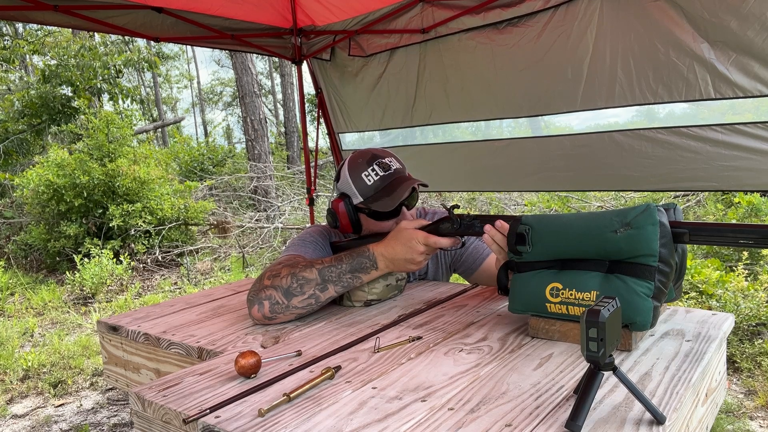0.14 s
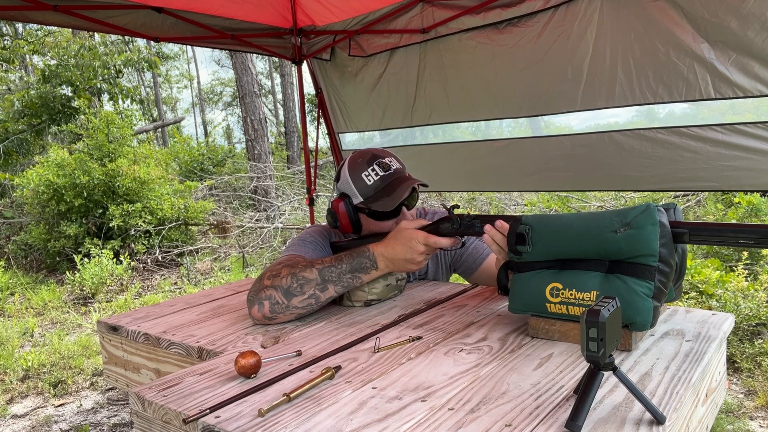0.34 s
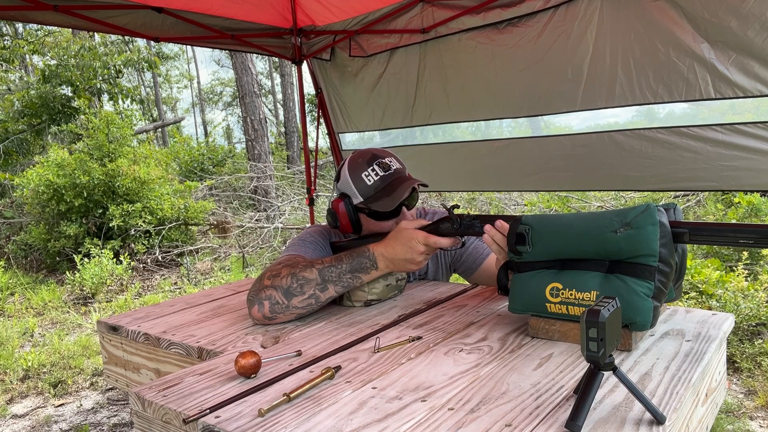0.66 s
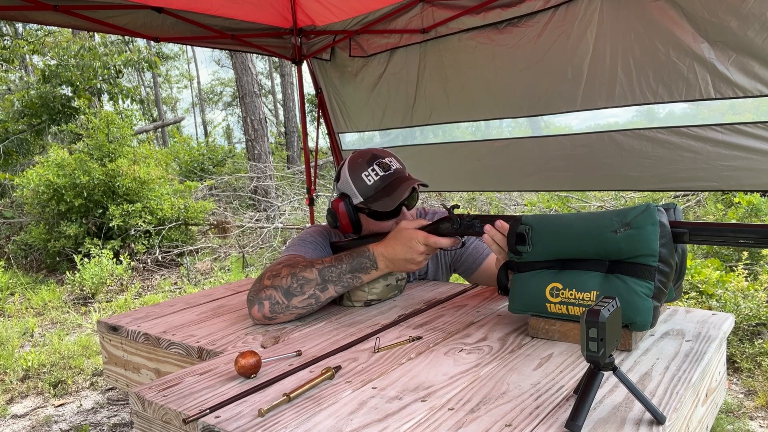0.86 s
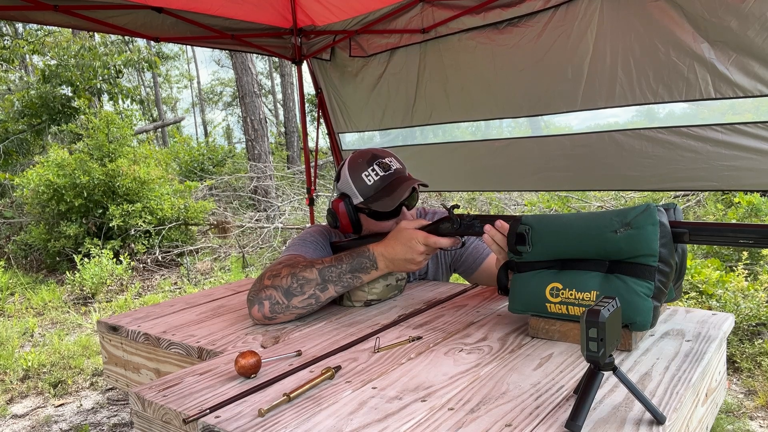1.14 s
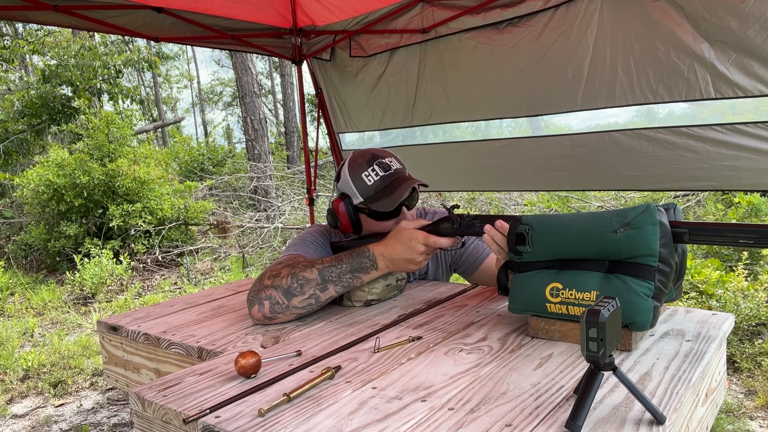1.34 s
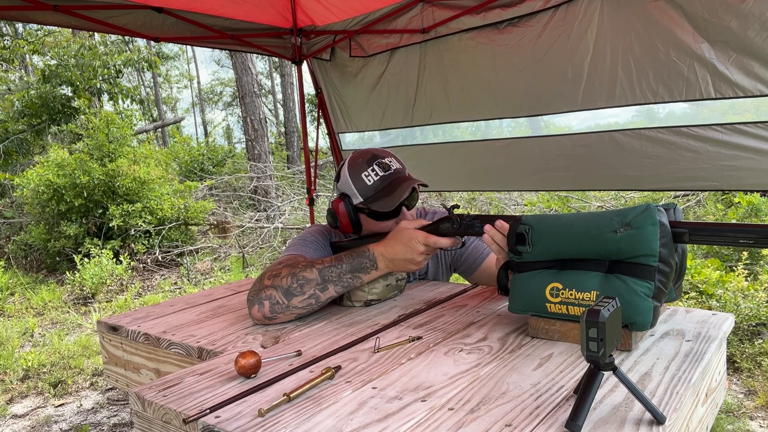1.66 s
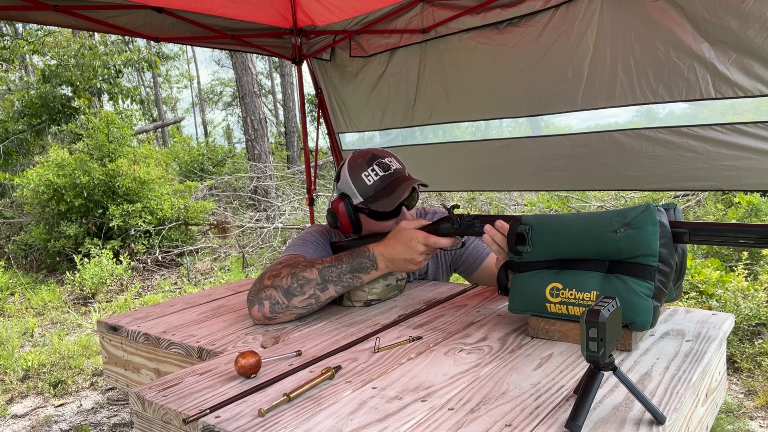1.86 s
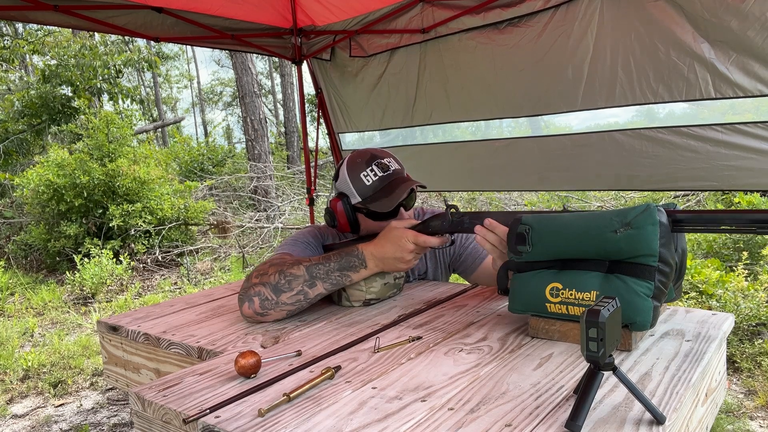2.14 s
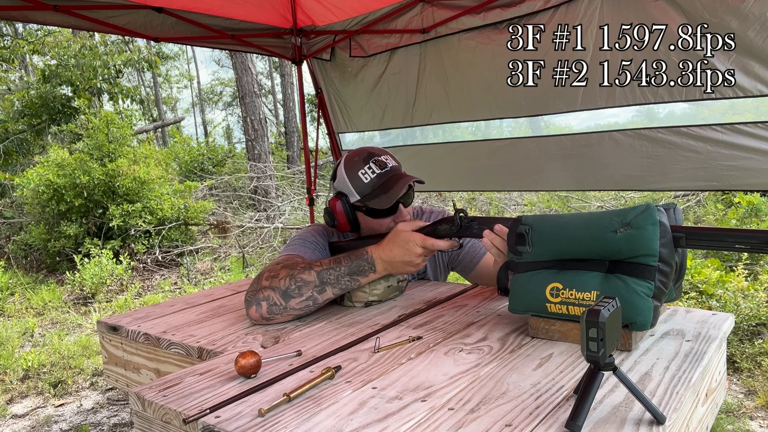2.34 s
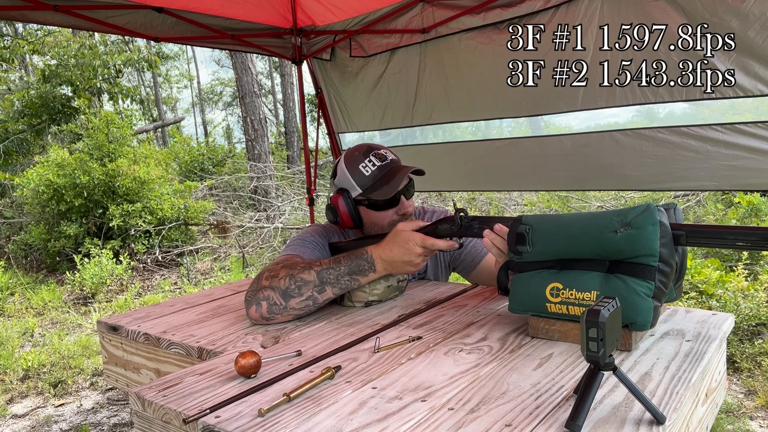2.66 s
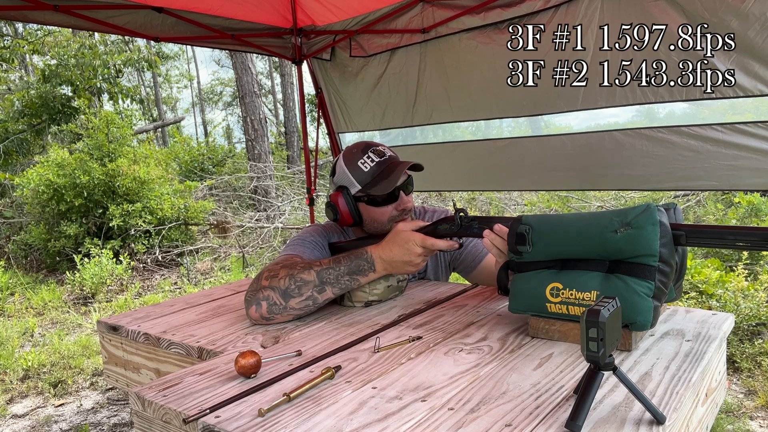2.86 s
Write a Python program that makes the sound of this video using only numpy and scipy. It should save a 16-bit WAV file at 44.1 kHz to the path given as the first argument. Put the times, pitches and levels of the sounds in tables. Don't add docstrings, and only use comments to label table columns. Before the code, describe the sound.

A single rifle shot cracks sharply outdoors, its echoes rolling away through woods after quiet insects

```python
import sys
import numpy as np
from scipy import signal
from scipy.fft import rfft, irfft
from scipy.io import wavfile

SR = 44100
rng = np.random.default_rng(int(sys.argv[2]) if len(sys.argv) > 2 else 0)


def amplitude_ratio(level_db):
    exponent = np.asarray(level_db, float) / 20
    return 10 ** exponent


def to_wav(sig):
    pcm = np.clip(np.atleast_2d(sig), -1, 1) * 32767
    pcm = np.round(pcm).astype(np.int16)
    wavfile.write(sys.argv[1], SR, pcm.T)


N = 132300
T = np.arange(N) / SR

NEAR_S = 2.059
FAR_REF_S = 2.36


def at_hz(points, hz):
    points = np.array(points)
    return np.interp(np.log(hz), np.log(points[:, 0]), points[:, 1])


def rms_one(x):
    return x / np.sqrt(np.mean(x ** 2) + 1e-20)


def drift(rate):
    r = np.exp(-80 * np.pi * rate / SR)
    slow = signal.lfilter([1], [1, -2 * r, r * r], rng.standard_normal(N // 40 + 2002))[2000:]
    return np.interp(np.arange(N) / 40, np.arange(len(slow)), rms_one(slow))


def resonate(x, hz, width_hz):
    r = np.exp(-np.pi * width_hz / SR)
    ring = [1, -2 * r * np.cos(2 * np.pi * hz / SR), r * r]
    return signal.lfilter([(1 - r * r) / 2, 0, (r * r - 1) / 2], ring, x)


def resonate_twice(x, hz, width_hz):
    return resonate(resonate(x, hz, width_hz), hz, width_hz)


def ports(mid, side):
    return np.array([mid + side, mid - side])


def banded(spectrum, side_db, top_db, patchy_db, t60=None):
    port_lag_s, likeness = 0.43 / 1000, 0.5
    null_hz, null_width_hz = 10100, 1600
    side_top_hz, knee_s = 12000, 0.37
    hz = np.arange(N // 2 + 1) * SR / N + 1e-3
    mid, own = rfft(rng.standard_normal((2, N)))
    turned = -1j * np.sign(np.sin(2 * np.pi * hz * port_lag_s)) * mid
    apart = likeness * turned + np.sqrt(1 - likeness ** 2) * own
    null = 1 - np.exp(-((hz - null_hz) / null_width_hz) ** 4)
    above, below = hz > 1.05 * spectrum[-1][0], hz < spectrum[0][0]
    colour = amplitude_ratio(at_hz(spectrum, hz) - 60 * above - 30 * below)
    unlike_treble = amplitude_ratio(top_db) * (hz > side_top_hz) / colour
    side = np.maximum(amplitude_ratio(at_hz(side_db, hz)), unlike_treble) * null * apart
    pair = ports(mid, side) * colour / np.sqrt(np.mean(colour ** 2))
    out, together = 0, drift(9)
    for centre in 30 * 2.0 ** np.arange(10):
        db = patchy_db * (0.61 * together + drift(20))
        if t60:
            late = np.clip(T - FAR_REF_S, 0, 9)
            db = db - 60 * late ** 2 / (late + knee_s) / at_hz(t60, centre)
        octave = np.clip(1 - np.abs(np.log2(hz / centre)), 0, 1)
        out = out + amplitude_ratio(db) * irfft(pair * octave, N)
    return out


def traffic_rumble():
    # pitch in Hz, strength in dB per Hz
    rumble_colour = [(20, -30.5), (55, -3), (100, -0.5), (420, -22), (1000, -40.5), (1700, -45),
                     (9500, -38), (11500, -61)]
    # pitch in Hz, side over mid in dB
    rumble_side = [(60, -16), (110, -12), (200, -9.5), (380, -3), (700, 4), (1290, 1.5), (2380, -1),
                   (4400, 2), (8120, -1.5), (15000, 11)]
    return amplitude_ratio(-56.5) * banded(rumble_colour, rumble_side, top_db=-57, patchy_db=1.5)


def insects():
    # pitch in Hz, width in Hz, level in dB, throbs per second, throb depth from 0 to 1
    choirs = [(8240, 430, -67, 73, 0.31), (7190, 890, -71.5, 64, 0.2), (2990, 1170, -80, 47, 0.22),
              (4550, 870, -86, 50, 0.1)]
    dull = signal.butter(10, 8700, fs=SR, output="sos")
    out = 0
    for hz, width_hz, db, rate, depth in choirs:
        mid, side = resonate_twice(rng.standard_normal((2, N)), hz, width_hz)
        beats = np.cumsum(rate * (1 + 0.049 * drift(4.8))) / SR
        throb = 1 + depth * np.sin(2 * np.pi * beats)
        side = amplitude_ratio(-1.5) * signal.sosfilt(dull, rms_one(side))
        out = out + amplitude_ratio(db) * throb * ports(rms_one(mid), side)
    return out


def quail():
    # start in seconds, length in seconds, start pitch in Hz, end pitch in Hz, level in dB
    whistles = [
        (.862, 0.11, 1670, 1800, -78),
        (1.478, 0.11, 1643, 2000, -70.5),
    ]
    glide_s, edge_s, sag_db_per_s = 0.027, 0.014, 35
    echo_db, echo_t60_s = -9.5, 3.5
    lean = amplitude_ratio(np.array([[1.5], [-1.5]]))
    out = 0
    for s, length, low_hz, high_hz, db in whistles:
        t = np.clip(T - s, 0, 9)
        pitch_hz = high_hz - (high_hz - low_hz) * np.exp(-t / glide_s)
        tone = np.sin(2 * np.pi * np.cumsum(pitch_hz) / SR)
        env = np.clip(np.minimum(t, length - t) / edge_s, 0, 1) * amplitude_ratio(-sag_db_per_s * t)
        ring = rms_one(resonate(rng.standard_normal((2, N)), high_hz - 15, 20))
        tail = np.clip(t / length, 0, 1) * amplitude_ratio(echo_db - 60 * t / echo_t60_s)
        out = out + amplitude_ratio(db) * (np.sqrt(2) * env * tone * lean + tail * ring)
    return out


def far_woods():
    # pitch in Hz, strength in dB per Hz
    far_colour = [(25, -8), (60, -1), (241, -5), (728, -15), (1790, -15), (4630, -20), (12000, -33),
                  (13400, -62)]
    # pitch in Hz, side over mid in dB
    far_side = [(60, -8.5), (110, -13), (200, -5.5), (380, -2.5), (700, 7.5), (1290, 6), (2380, -1),
                (4400, 0.5), (8120, 0), (15000, 4.5)]
    # pitch in Hz, time to fall by 60 dB in seconds
    far_t60 = [(40, 1.15), (300, 3.6), (1000, 2.46), (3000, 1.23), (6000, .85), (12000, .38)]
    return amplitude_ratio(-34) * (T > NEAR_S) * banded(far_colour, far_side, -36, patchy_db=1.0, t60=far_t60)


def near_trees():
    # pitch in Hz, strength in dB per Hz
    near_colour = [(22, -20), (60, -5.5), (245, -4.5), (700, -23.5), (1150, -20), (2480, -18.5),
                   (10500, -29), (16000, -47)]
    # pitch in Hz, side over mid in dB
    near_side = [(60, -9), (110, -7), (200, -8), (380, -5), (700, 4), (1290, 1.5), (2380, -1.5),
                 (4400, -0.5), (8120, 0), (15000, 9)]
    rise_s, hold_s, t60_s = 0.012, 0.022, 0.19
    t = T - NEAR_S
    fall = amplitude_ratio(-60 * np.clip(t - rise_s - hold_s, 0, 9) / t60_s)
    env = np.clip(t / rise_s, 0, 1) ** 2 * fall
    return amplitude_ratio(-23.5) * env * banded(near_colour, near_side, top_db=-34, patchy_db=1.5)


def boom():
    # pitch in Hz, level in dB, time to fall by 60 dB in seconds
    body_modes = [(60.4, -24.5, .3), (124, -31.5, 0.22), (235, -21, .16), (147.4, -31, 0.22)]
    start_s, rise_s = 2.062, 0.012
    t = np.clip(T - start_s, 0, 9)

    def ringing():
        return sum(amplitude_ratio(db - 60 * t / t60) * np.sin(2 * np.pi * (hz * t + rng.random()))
                   for hz, db, t60 in body_modes)

    mid, side = ringing(), ringing()
    return np.clip(t / rise_s, 0, 1) * ports(mid, amplitude_ratio(-1.5) * side)


def strike():
    # time in seconds, peak in dB, half-wave in ms, right lag in ms
    hit = (2.1582, -8, .1, .07)
    s, db, half_ms, lag_ms = hit
    port_lag_s = np.array([[0], [lag_ms]]) / 1000
    u = (T - s - port_lag_s) / half_ms * 1000
    return -amplitude_ratio(db) * (1 - 2 * u ** 2) * np.exp(-u ** 2)


def swell():
    # pitch in Hz, width in Hz, level in dB
    port_tones = [
        [(1440, 120, -21), (2278, 190, -20.5), (2940, 150, -22), (5330, 150, -33), (6260, 150, -29),
         (7840, 110, -27.5)],
        [(1520, 180, -29), (2900, 180, -21), (3137, 120, -26), (4280, 150, -31), (6216, 150, -25.5),
         (7800, 110, -24.5)],
    ]
    start_s, end_s, rise_db_per_s, fade_s = 2.021, 2.044, 652, 0.0064
    env = np.clip((T - start_s) / 0.0057, 0, 1) * amplitude_ratio(rise_db_per_s * np.clip(T - end_s, -1, 0))
    env = env * np.exp(-(np.clip(T - end_s, 0, 1) / fade_s) ** 2)
    tones = [sum(amplitude_ratio(db) * rms_one(resonate_twice(rng.standard_normal(N), hz, width_hz))
                 for hz, width_hz, db in port) for port in port_tones]
    return env * np.array(tones)


def bursts():
    # time in seconds, peak in dB, centre pitch in Hz, length in seconds, left lag in ms
    puffs = [(2.0424, -8, 8350, 0.001, 0.0), (2.0445, -14, 3000, .003, .1), (2.049, -2, 800, .0022, .55),
             (2.049, -5, 2900, .003, .17), (2.052, -7, 3450, 0.0013, -0.0026),
             (2.052, -17, 11000, 0.00075, 0.0), (2.170, -31, 3200, .001, 0.37),
             (2.1745, -28, 7000, .001, .1), (2.354, -16, 1870, 0.0023, .1),
             (2.361, -24.5, 2180, 0.0033, .1), (2.382, -26, 3000, 0.0016, 0.039),
             (2.441, -19, 1810, 0.0044, .1), (2.451, -24.5, 2000, 0.0023, .1),
             (2.7555, -24, 1100, 0.00082, .2), (2.042, -19, 500, 0.0079, 0.36),
             (2.046, -18, 149, .012, 2.06), (2.055, -21.5, 262, 0.0034, 1.8),
             (2.047, -19, 8900, 0.004, 0.0), (2.384, -31.5, 54.6, 0.036, .4),
             (2.158, -25.5, 9050, 0.001, 0.0), (2.1595, -21.5, 707, .0015, 0.36),
             (2.288, -31, 70, .014, 0.27), (2.81, -27.5, 350, 0.014, 0.44), (2.77, -31, 130, .015, 0.34)]
    width, likeness = 0.81, 0.6
    out = np.zeros((2, N))
    t = np.arange(-2000, 2000) / SR
    for s, db, hz, length, lag_ms in puffs:
        shared, left, right = rng.standard_normal((3, len(t)))
        late = np.interp(t - lag_ms / 1000, t, shared)
        pair = np.sqrt(likeness) * np.array([late, shared])
        pair = pair + np.sqrt(1 - likeness) * np.array([left, right])
        puff = resonate_twice(pair, hz, width * hz) * np.exp(-(t / length) ** 2)
        dull = signal.butter(4, min(3.5 * hz, 15000), fs=SR, output="sos")
        puff = signal.sosfilt(dull, puff)
        i = int(s * SR) - 2000
        out[:, i:i + len(t)] += amplitude_ratio(db) * puff / np.abs(puff).max(axis=1, keepdims=True)
    return out


def scene():
    # time in seconds, gain in dB
    gain_steps = [
        (2.03, 0),
        (2.052, -6),
        (2.056, -30.5),
        (2.19, -25),
        (2.22, -28.5),
        (2.336, -27),
        (2.352, -16),
        (2.6, -16.5),
        (3.0, -16),
    ]
    times, gains = np.transpose(gain_steps)
    gain_db = np.interp(T, times, gains)
    woods = traffic_rumble() + insects() + quail()
    roll = amplitude_ratio(gain_db - np.interp(FAR_REF_S, times, gains)) * far_woods()
    shot = swell() + bursts() + strike() + boom()
    return amplitude_ratio(gain_db) * woods + roll + near_trees() + shot


def roll_off(x):
    return signal.sosfilt(signal.butter(12, 17150, fs=SR, output="sos"), x)


def record(dry):
    ceiling = 0.97
    rounded = ceiling * np.tanh(dry / ceiling)
    cut = signal.cheby2(12, 60, 16800, fs=SR, output="sos")
    return roll_off(signal.sosfilt(cut, rounded))


dry = scene()
out = record(dry)
to_wav(out)
```